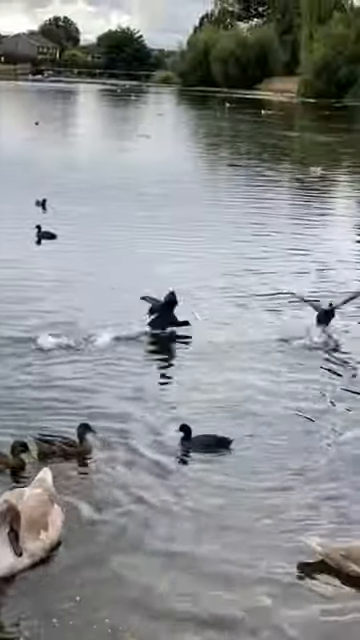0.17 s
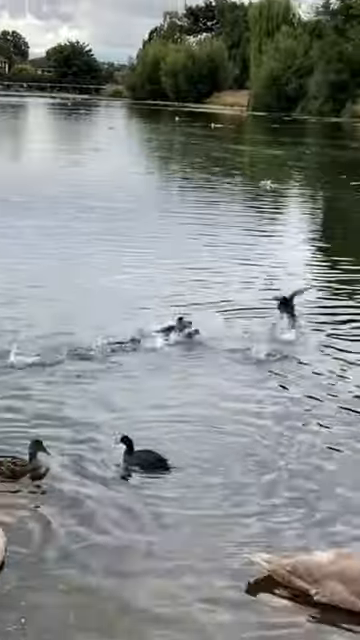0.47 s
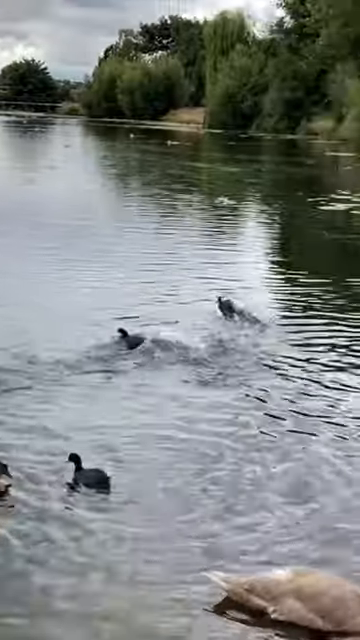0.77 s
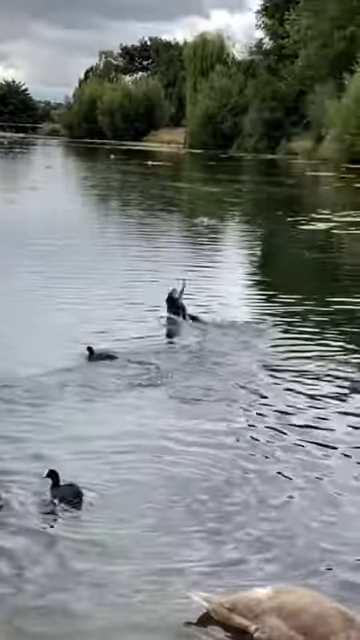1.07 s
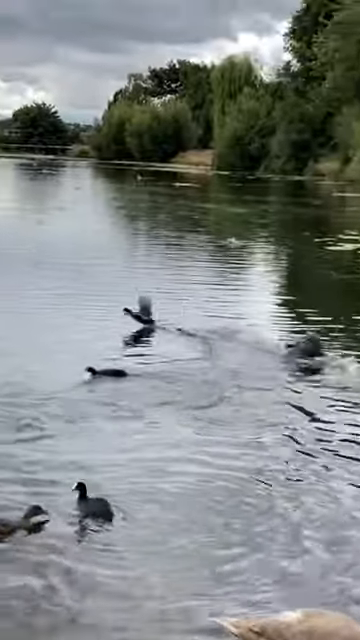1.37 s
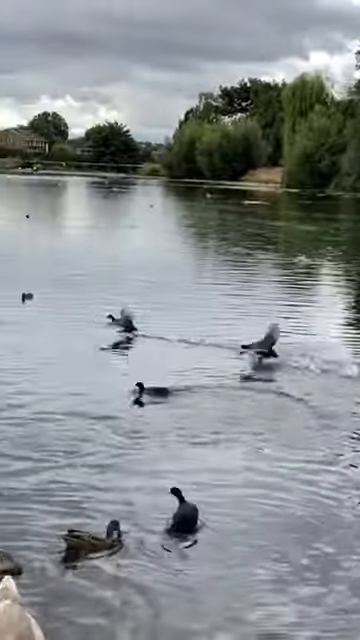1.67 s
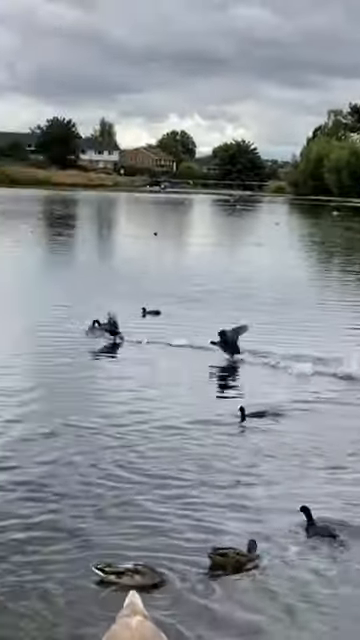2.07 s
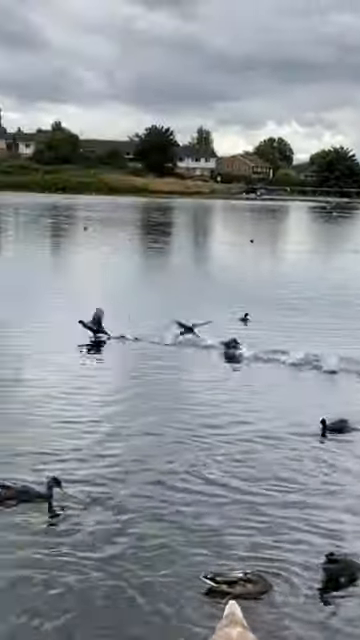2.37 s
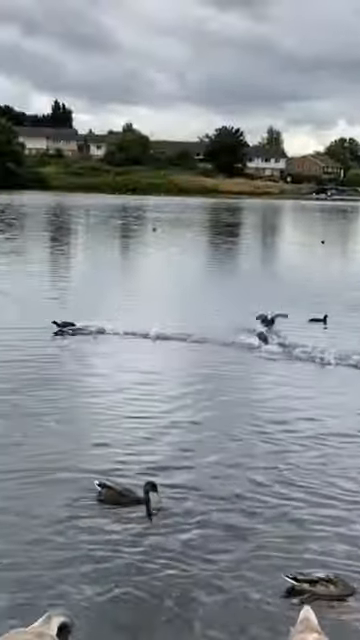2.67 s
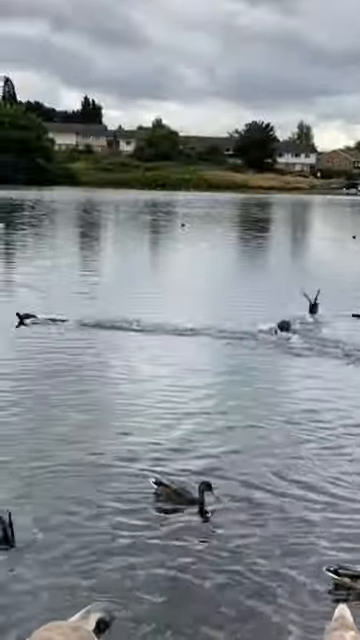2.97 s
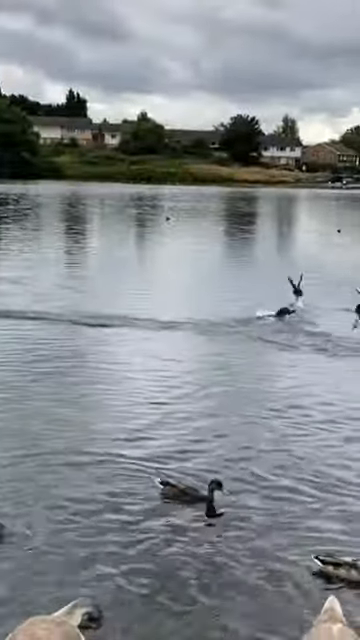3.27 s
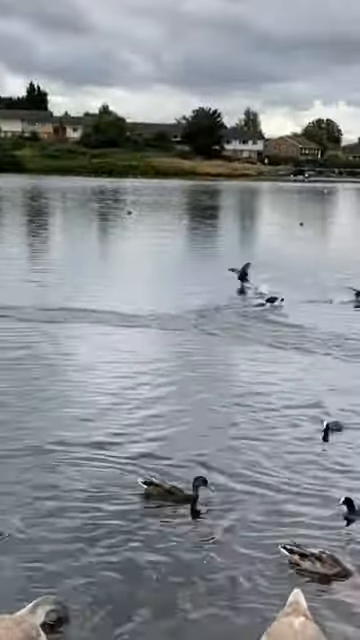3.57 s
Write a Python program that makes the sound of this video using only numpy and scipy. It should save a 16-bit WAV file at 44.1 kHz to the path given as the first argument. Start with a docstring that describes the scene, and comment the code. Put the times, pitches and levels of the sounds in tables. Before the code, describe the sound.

Waterbirds chase over open water, feet slapping and wings smacking, giving brief harsh squawks

```python
"""Coots chasing across a lake

Coots run on the surface and give short, sharp calls: rattling harmonic series shaped by throat resonances.
Feet slap (noise bursts), wings smack (damped tones), and plunges leave ringing bubbles and falling spray;
the splashing grows fainter at the end as the chase moves away.
A steady distant wash lies behind, and a light wind rumbles mainly on the right microphone port."""
import sys
import numpy as np
from scipy import signal
from scipy.fft import rfft, irfft
from scipy.io import wavfile

SR = 44100
rng = np.random.default_rng(int(sys.argv[2]) if len(sys.argv) > 2 else 0)


def master_out(mix):
    """Clip the mix to full scale and print it as 16-bit PCM to the path in sys.argv[1]."""
    frames = np.transpose(np.atleast_2d(mix))
    ceiling = np.clip(frames, -1, 1)
    pcm = np.round(ceiling * 32767).astype(np.int16)
    wavfile.write(sys.argv[1], SR, pcm)


N = 164052

T = np.arange(N) / SR  # seconds
BIN_HZ = np.maximum(np.arange(N // 2 + 1) * SR / N, 1)
CUTOFF_HZ = 15900  # upper band limit


def from_db(db):
    """Logarithmic level: decibels to amplitude gain."""
    return 10 ** (np.asarray(db) / 20)


def rms_one(x):
    """Normalisation: scale to rms 1."""
    return x / np.sqrt(np.mean(x ** 2) + 1e-20)


def at_hz(points, hz):
    """Spectral interpolation: read a curve on a log-frequency axis."""
    f, value = np.transpose(points)
    return np.interp(np.log(hz), np.log(f), value)


def in_time(rows):
    """Envelope interpolation: read a curve at every sample."""
    return np.interp(T, *np.transpose(rows))


def colour(x, spectrum):
    """Linear filtering by a smooth spectrum that keeps the power of white noise."""
    gain = rms_one(from_db(at_hz(spectrum, BIN_HZ)))
    return irfft(rfft(x) * gain, N)


def drift(rate_hz):
    """Low-pass random process: slow chance with spread 1."""
    slowed = rfft(rng.standard_normal(N)) / (1 + (BIN_HZ / rate_hz) ** 2)
    return rms_one(irfft(slowed, N))


def spread(direct, diffuse):
    """Partial coherence: a common direct sound plus a diffuse part of opposite sign at the two ports."""
    # diffuse share: (frequency [Hz], gain [dB])
    diffuse_share = [(500, -20), (2300, -9), (4300, -10), (5000, -21), (6000, -21), (7000, -11),
                     (10200, -10), (11500, -20), (13200, -9)]
    side = irfft(rfft(diffuse) * from_db(at_hz(diffuse_share, BIN_HZ)), N)
    return direct + side * np.array([[1], [-1]])


def grains(per_s, low_hz, high_hz, cycles, size_db, count=36):
    """Random impulses excite damped resonators: uneven rings of scattered pitch, flat overall spectrum."""
    sizes = from_db(size_db * np.minimum(rng.exponential(1, N), 4))
    sizes = sizes * rng.choice([-1, 1], N)
    clicks = sizes * (rng.random(N) < per_s / SR)
    dealt = rng.integers(0, count, N)  # the resonator that each click excites
    out = np.zeros(N)
    for k, hz in enumerate(np.geomspace(low_hz, high_hz, count)):
        radius = np.exp(-np.log(1000) * hz / (cycles * SR))  # falls 60 dB in the given cycles
        angle = 2 * np.pi * hz / SR
        feedback = [1, -2 * radius * np.cos(angle), radius * radius]
        excitation = clicks * (dealt == k) + 1e-18 * sizes
        out += hz * signal.lfilter([1, 0, -1], feedback, excitation)
    return rms_one(out)


def wash():
    """Stationary, partly diffuse filtered noise: the steady sound of the far shore."""
    # wash spectrum: (frequency [Hz], relative density [dB per Hz])
    wash_spectrum = [(25, -29), (60, -0.5), (150, -26), (280, -11), (400, -14), (540, 0.5), (800, -4.5),
                     (1200, -7), (2000, -16.5), (3200, -27), (8000, -27), (16000, -49)]
    level_db = -47.5
    return from_db(level_db) * colour(spread(*rng.standard_normal((2, N))), wash_spectrum)


def wind():
    """Low-frequency noise with a random envelope on the right port; a little reaches the left inverted."""
    # wind spectrum: (frequency [Hz], relative density [dB per Hz])
    wind_spectrum = [(20, -9), (35, -9), (55, 2.5), (110, 0.5), (160, -3), (210, -1.5), (310, -10),
                     (420, -15), (700, -57), (2000, -81)]
    # puffs of wind: (time [s], rise above the steady rumble [dB])
    gust_rows = [(0.79, 5.8), (0.93, 2.5), (1.75, 2.5), (2.28, 3.9), (2.75, 1.8)]
    level_db, left_db, gust_s = -42.5, -26, 0.018  # left is relative to right
    gusts = sum(db * np.exp(-((T - s) / gust_s) ** 2) for s, db in gust_rows)
    gain = from_db(level_db + gusts + 1.8 * drift(20))
    rumble = gain * colour(rng.standard_normal(N), wind_spectrum)
    rumble = signal.sosfilt(signal.butter(2, 30, "high", fs=SR, output="sos"), rumble)
    return np.array([-from_db(left_db) * rumble, rumble])


def spray():
    """Random superposition of short rings: thrown drops patter back on the surface in clumps."""
    # level of the falling spray: (time [s], level before the common gain [dB])
    spray_levels = [(0.0, -51), (0.25, -56), (1.22, -54.5), (1.44, -50), (1.67, -52), (1.88, -52),
                    (2.31, -52), (2.51, -55), (2.67, -53.5), (3.02, -61), (3.72, -59.5)]
    # drop spectrum: (frequency [Hz], relative density [dB per Hz])
    spray_spectrum = [(1500, 3.5), (2800, 0.5), (4200, 2), (5600, -3.5), (8000, 1), (10000, -1.5),
                      (12500, -7), (16000, -6)]
    drops_per_s, ring_cycles, gain_db = 9000, 5.1, 5
    drops = spread(*[grains(drops_per_s, 1300, SR / 2.2, ring_cycles, size_db=2.0) for _ in range(2)])
    clumps_db = 2.87 * drift(14.7)
    return from_db(in_time(spray_levels) + gain_db + clumps_db) * colour(drops, spray_spectrum)


def churn():
    """Bubble resonance in random succession: the wake seethes in clumps and surges with every plunge."""
    # plunging feet and wings: (peak time [s], nominal half-length [s], level before colouring [dB])
    plunge_rows = [(0.195, 0.027, -48.5), (0.27, 0.026, -43.5), (0.407, 0.041, -44.5), (0.492, 0.016, -52),
                   (0.568, 0.033, -49.5), (0.78, 0.019, -44), (1.041, 0.021, -46.5), (1.113, 0.011, -42),
                   (1.275, 0.018, -44.5), (1.435, 0.026, -47), (1.52, 0.007, -46), (1.703, 0.039, -48),
                   (1.883, 0.022, -42), (1.975, .007, -43.5), (2.071, 0.018, -43.5), (2.128, 0.013, -48.5),
                   (2.23, 0.056, -52.5), (2.336, 0.013, -49.5), (2.425, 0.024, -48), (2.484, 0.02, -47),
                   (2.551, 0.031, -46), (2.83, 0.01, -44.5), (2.921, 0.012, -48), (3.426, 0.023, -51),
                   (3.607, 0.0089, -47.5)]
    # level of the churned water: (time [s], level before the common gain [dB])
    churn_levels = [(0.0, -43.5), (0.27, -48.5), (0.73, -48.5), (1.07, -47.5), (1.62, -44), (1.94, -45.5),
                    (2.38, -45.5), (2.5, -46.5), (2.98, -52.5), (3.72, -52.5)]
    # bubble spectrum: (frequency [Hz], relative density [dB per Hz])
    bubble_spectrum = [(250, 8), (400, 6), (540, 11.5), (780, 2.5), (1100, 6), (1600, -0.5), (2200, -5.5),
                       (3000, -13), (4500, -14), (8000, -72)]
    bubbles_per_s, bubble_cycles, bubble_size_db = 500, 21, 3.2
    froth_per_s, froth_cycles, froth_size_db = 800, 11.5, 3.6
    gain_db, clump_db = -6.5, 2.2
    rise_share, fall_share = 0.82, 0.95  # of the nominal half-length
    bubbles = spread(*[grains(bubbles_per_s, 418, 4340, bubble_cycles, bubble_size_db) for _ in range(2)])
    froth = spread(*[grains(froth_per_s, 428, 4600, froth_cycles, froth_size_db) for _ in range(2)])
    plunges = np.zeros(N)
    for s, half, db in plunge_rows:
        width = half * np.where(T < s, rise_share, fall_share)
        plunges += from_db(db) * np.exp(-.5 * ((T - s) / width) ** 2)
    seething = from_db(in_time(churn_levels) + gain_db + clump_db * drift(20)) * bubbles
    return colour(seething + plunges * froth, bubble_spectrum)


def plops():
    """Volume resonance of a closing air pocket: a large bubble rings briefly and rises in pitch."""
    # plops: (time [s], starting frequency [Hz], nominal peak level [dB])
    plop_rows = [(1.550, 496, -28), (2.177, 562, -24), (2.533, 560, -22), (2.632, 543, -28.5),
                 (0.514, 555, -28), (3.16, 490, -28)]
    decay_cycles = 24.3  # cycles of the starting pitch for a 60 dB fall
    phase_rise_per_s = 6.4  # pitch rises at twice this fraction
    out = np.zeros(N)
    for s, hz, db in plop_rows:
        t = np.clip(T - s, 0, .1)
        decay = from_db(db - 60 * t * hz / decay_cycles)
        onset = 1 - np.exp(-t * hz * 2)
        out += decay * onset * np.sin(2 * np.pi * hz * t * (1 + phase_rise_per_s * t))
    return out


def smacks():
    """Damped cavity resonance: a wing traps air against the water in a sudden, gritty, hollow knock."""
    # smacks: (time [s], frequency [Hz], level of the tone at onset [dB])
    smack_rows = [(0.264, 690, -28), (0.283, 860, -25.5), (0.399, 700, -28), (0.413, 1710, -41),
                  (0.484, 1240, -30), (0.777, 1450, -28.5), (0.970, 1720, -26.5), (1.110, 1120, -35),
                  (1.275, 1400, -35), (1.285, 1020, -30), (1.511, 1240, -29.5), (1.874, 1370, -29),
                  (2.042, 1560, -32.5), (2.081, 1020, -24), (3.542, 2000, -33)]
    decay_cycles, grit_share = 12, .45  # cycles for a 60 dB fall; noise rms against tone amplitude
    out = np.zeros(N)
    t = np.arange(SR // 25) / SR
    for s, hz, db in smack_rows:
        band = signal.butter(2, [hz / 2, hz * 2], "band", fs=SR, output="sos")
        grit = rms_one(signal.sosfilt(band, rng.standard_normal(len(t))))
        decay = from_db(db - 60 * t * hz / decay_cycles)
        out[int(s * SR) + np.arange(len(t))] += decay * (np.sin(2 * np.pi * hz * t) + grit_share * grit)
    return out


def slaps():
    """Impact of a foot on water: milliseconds of broadband crackle, one sharp snap, then a short hiss."""
    # slaps: (time [s], level before the common gain [dB], body against treble [dB], snap against crackle [dB])
    slap_rows = [(0.0435, -38, -12, -21), (0.055, -39, -5, -11), (0.0985, -39.5, -3, -13),
                 (0.1744, -45.5, -5, -12), (0.2307, -40, -15, 0), (0.2559, -41.5, -9, -4),
                 (0.9186, -44, -21, -2), (0.9670, -41.5, 0, -17), (1.1245, -38, -3.5, -3),
                 (1.2862, -36, -7, -12), (1.349, -38.5, -19, 6), (1.357, -39.5, -13, -23),
                 (1.439, -40, -4, -4), (1.668, -42.5, -7, -8), (1.753, -41, -3, -8),
                 (1.8256, -40.5, -9, -6), (1.9063, -33.5, 2, 0.5), (1.9845, -37.5, -9.5, -3),
                 (2.0809, -38, -6.5, -8), (2.18, -35.5, -8.5, 3), (2.607, -59, -8, 0),
                 (3.025, -49.5, -2, -6), (3.1997, -56.5, -6, 2), (3.5111, -51, -4, -10)]
    # spectrum of the crack: (frequency [Hz], relative level [dB])
    crack_spectrum = [(2000, -58), (5500, -7.5), (8000, -0.5), (10500, -1), (13000, -5), (16000, -3)]
    # spectrum of the body: (frequency [Hz], relative level [dB])
    body_spectrum = [(250, -35), (600, -2), (2000, 10), (4300, 12), (6500, 15.5), (12000, -73)]
    gain_db, rise_s, decay_s, tail_s, tail_db, snap_s = 27, 0.002, 0.003, 0.014, -16, .0007
    crack, body = np.zeros(N), np.zeros(N)
    t = np.arange(-SR // 100, SR // 20) / SR
    burst = np.exp(-np.abs(t) / np.where(t < 0, rise_s, decay_s))
    hiss_tail = (t > 0) * from_db(tail_db) * np.exp(-np.abs(t) / tail_s)
    # the snap sweeps from 0 Hz to the band limit
    snap = (t >= 0) * (t < snap_s) * np.cos(np.pi * CUTOFF_HZ * t * t / snap_s)
    snap = snap / np.linalg.norm(snap)
    for s, db, body_db, snap_db in slap_rows:
        crackle = (burst + hiss_tail) * rng.standard_normal(len(t))
        crackle = crackle / np.linalg.norm(crackle)
        snap_gain = from_db(snap_db)
        hit = (crackle + snap_gain * snap) / np.hypot(1, snap_gain)
        where = int((s + t[0]) * SR) + np.arange(len(t))
        crack[where] += from_db(db + gain_db) * hit
        body[where] += from_db(db + gain_db + body_db) * hit
    return colour(crack, crack_spectrum) + colour(body, body_spectrum)


def squeaks():
    """Additive synthesis of a gliding harmonic tone: a far bird gives a thin, falling note."""
    # squeaks: (start [s], length [s], start pitch [Hz], end pitch [Hz], reference level [dB])
    squeak_rows = [(3.345, 0.047, 772, 750, -51.5)]
    # partials: (multiple of the pitch, level against the reference [dB])
    partials = [(2, 2), (4, -7), (5, 0)]
    jitter_share = .018
    out = np.zeros(N)
    for start, length, from_hz, to_hz, db in squeak_rows:
        share = np.clip((T - start) / length, 0, 1)
        glide_hz = to_hz + (from_hz - to_hz) * (1 - share) ** 2
        phase = 2 * np.pi * np.cumsum(glide_hz * (1 + jitter_share * drift(290))) / SR
        arch = np.sqrt(np.abs(np.sin(np.pi * share)))
        out += arch * sum(from_db(db + part_db) * np.sin(k * phase) for k, part_db in partials)
    return out


def calls():
    """Source-filter voice: rattling harmonics shaped by the throat; rasp shakes pitch and doubles the period."""
    # one list for each call: (time [s], pitch [Hz], level [dB], odd harmonics [dB],
    # harmonics above the third [dB], rasp [0-1])
    call_tracks = [
        [(0.006, 738, -58, -18, -12, 0.02), (0.016, 766, -30, -15, 0.5, 0), (0.034, 800, -30, -22, -1, 0.14),
         (0.046, 801, -33.5, -33, 9, 0.23), (0.056, 791, -38.5, 9, -1.5, 0.12), (0.080, 797, -34.5, 4, -1.5, 0),
         (0.106, 744, -41, 8.5, -13, 0.2), (0.120, 710, -50, 9, 7, .1)],
        [(1.557, 758, -41, -2, 8, 0.8), (1.568, 791, -30, -9, 1, 0.47), (1.574, 824, -26.5, -4, 5.5, 0.5),
         (1.590, 864, -27, -6.5, 3, 0.08), (1.606, 809, -27.5, -2, 3, 0.03), (1.619, 816, -25, -5, -4, 0),
         (1.629, 760, -32.5, -2, -25, 0), (1.645, 728, -35.5, 4, -21, 0), (1.654, 720, -50, 0, -14, .05)],
        [(2.220, 641, -37.5, -4, 1, 0.8), (2.236, 798, -36, -1, -4, 0.26), (2.254, 791, -34, -6, 0, 0),
         (2.277, 757, -36.5, -3, -4, 0.3), (2.305, 700, -43, -6, 1, 0.4)],
    ]
    # response of throat and bill: (frequency [Hz], relative level [dB])
    throat = [(790, -5.5), (1600, -3), (2000, -14), (2400, -14), (2800, -9.5), (3170, -14.5), (3400, -26),
              (4000, -12.5), (4900, -19), (5700, -25.5), (7400, -12), (8800, -27.5), (13000, -30)]
    rasp_hz, rasp_jitter, flutter_db, hiss_db = 400, 0.07, 2, -10.5
    rattle_hz, rattle_depth = 108, .45
    doubling = .6  # alternation of strong and weak cycles at full rasp
    out = np.zeros(N)
    jitter, shake = drift(rasp_hz), drift(rasp_hz)
    flutter = [drift(75) for _ in range(16)]
    hiss = colour(rng.standard_normal(N), throat)
    rattle_phase = 2 * np.pi * np.cumsum(rattle_hz * (1 + 0.097 * drift(31))) / SR
    rattle = rattle_depth * np.sin(rattle_phase)
    for call in call_tracks:
        s, *columns = np.transpose(call)
        on = (T >= s[0]) & (T < s[-1])
        pitch, db, odd_db, treble_db, rasp = [np.interp(T[on], s, c) for c in columns]
        phase = 2 * np.pi * np.cumsum(pitch * (1 + rasp_jitter * rasp * jitter[on])) / SR
        rough = 1 + rasp * (doubling * np.cos(phase / 2) + .5 * shake[on])
        for k in range(1, 17):
            level = db + at_hz(throat, k * pitch) + odd_db * (k % 2) + treble_db * (k > 3)
            level = level + flutter_db * flutter[k - 1][on]
            beating = 1 + rattle[on] * min(k / 5, 1.5)  # higher harmonics rattle more
            tone = np.sin(k * phase + 2 * np.pi * rng.random())
            out[on] += from_db(level) * tone * rough * beating
        air_gain = from_db(db + treble_db + hiss_db) * np.sqrt(np.abs(rasp))
        out[on] += air_gain * hiss[on] * (1 + rattle[on])
    return out


def bank_echo(x):
    """Diffuse scattering as convolution with decaying noise: the bank trails each call with a dull echo."""
    level_db, delay_s, decay_s, cut_hz = -17, 0.028, 0.089, 2900
    t = np.arange(SR // 2) / SR
    tail = (t > delay_s) * np.exp(-t / decay_s) * rng.standard_normal(len(t))
    tail = tail / np.linalg.norm(tail)
    tail = signal.sosfilt(signal.butter(2, cut_hz, fs=SR, output="sos"), tail)
    return from_db(level_db) * signal.fftconvolve(x, tail)[:N]


def ports(x):
    """Inter-channel transfer function: the right port hears the lake with its own phase and colour."""
    # phase between the ports: (frequency [Hz], lead of the left [rad])
    left_lead = [(100, 3.1), (500, 2.85), (750, 2.7), (1150, 1.95), (1650, 1.9), (2050, 1.1), (2600, 2.5),
                 (3400, 2.5), (4100, 1.95), (4900, 3.08), (6100, 3.2), (7700, 6.1), (9400, 6.35),
                 (11100, 9.2), (12500, 9.6), (14000, 12.5)]
    # right port against left: (frequency [Hz], gain [dB])
    right_gain = [(1700, 0), (2350, 5.5), (3200, 2), (3900, -1)]
    response = from_db(at_hz(right_gain, BIN_HZ)) * np.exp(-1j * at_hz(left_lead, BIN_HZ))
    return np.array([x[0], irfft(rfft(x[1]) * response, N)])


def scene():
    """Superposition: birds and water reach the two ports; wind blows across them."""
    voices = calls() + squeaks()
    splashes = slaps() + smacks() + plops() + churn() + spray()
    return ports(voices + bank_echo(voices) + splashes + wash()) + wind()


def record(dry):
    """Band limiting: a steep elliptic low-pass cuts the top."""
    low_pass = signal.ellip(12, .1, 80, CUTOFF_HZ, fs=SR, output="sos")
    return signal.sosfilt(low_pass, dry)


dry = scene()
out = record(dry)
master_out(out)
```